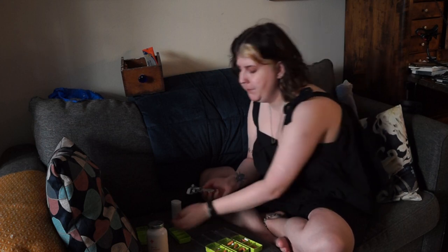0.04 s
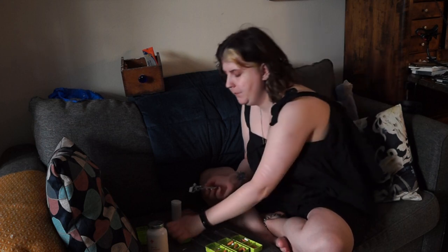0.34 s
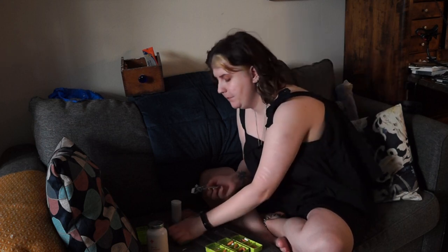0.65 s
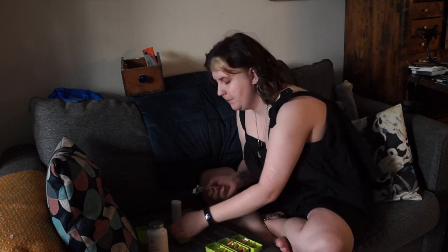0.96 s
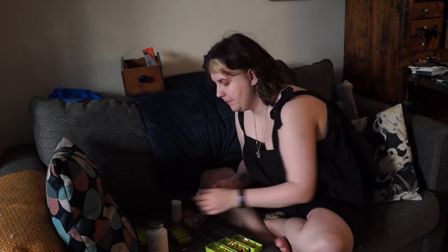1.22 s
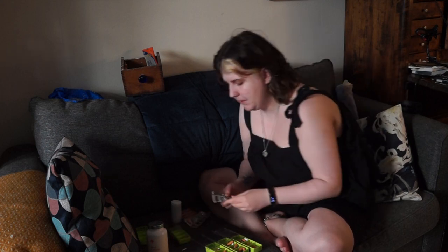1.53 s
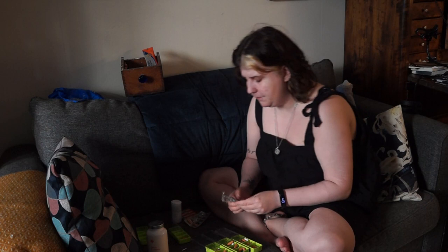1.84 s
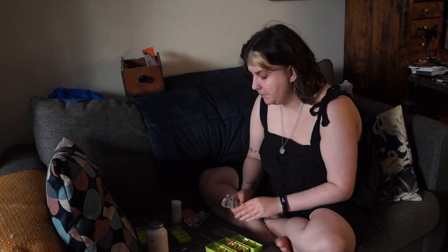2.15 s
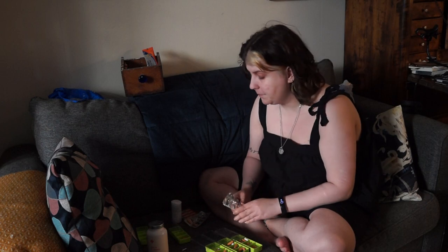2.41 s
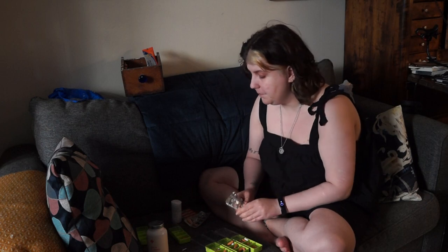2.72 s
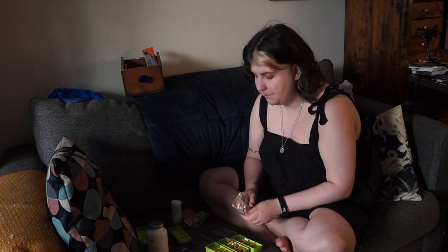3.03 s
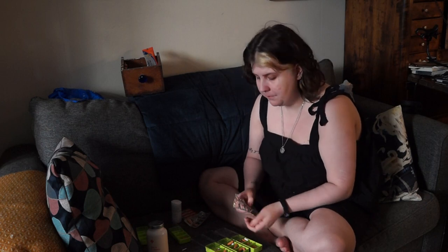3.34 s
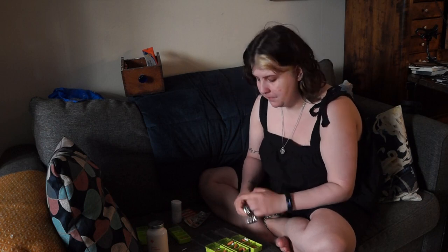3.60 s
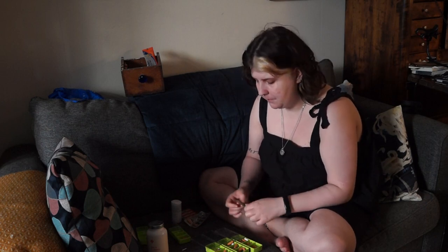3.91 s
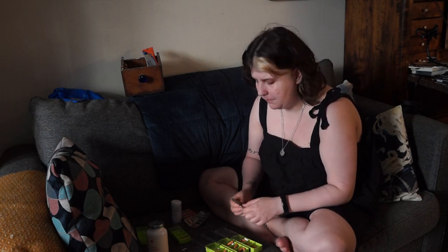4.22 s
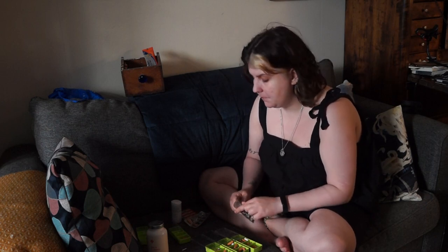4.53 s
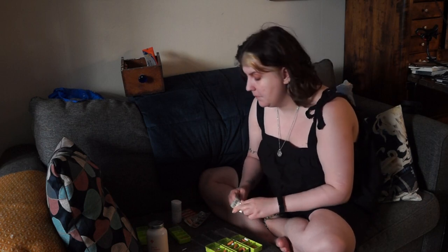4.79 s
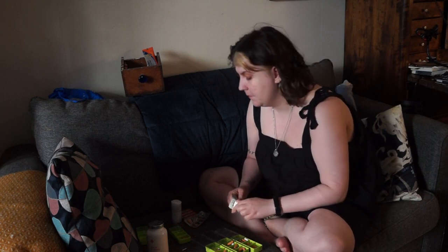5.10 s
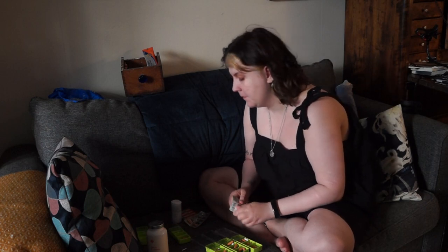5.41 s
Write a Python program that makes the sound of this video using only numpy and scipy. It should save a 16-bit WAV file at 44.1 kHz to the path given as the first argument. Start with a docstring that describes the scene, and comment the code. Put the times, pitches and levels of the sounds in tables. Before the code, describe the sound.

Faint room noise and a thin, high electronic whine run throughout in a small living room. After a light touch at about 0.4 seconds, two tablets land in a plastic organizer with bright, hard clicks at 0.6 and 0.8 seconds. From about 1.3 seconds, fingers handle a blister pack with soft rustles and small ticks. Its stiff pockets begin snapping sharply around 2.1 seconds, and the foil tears with a loud, short crackle at 2.3 seconds. Strong single snaps follow at 2.8 and 3.4 seconds, with lighter clicks and crinkling between and after them. From 4.4 seconds to about 5.5 comes the busiest stretch, a run of sharp snaps and foil crackles, strongest near 4.7 and 5.2 seconds. Everything sounds fairly near, with strong, quick echoes from the close walls that die away almost at once.

```python
"""A small living room: someone on a sofa drops two tablets into a plastic organizer, then presses more
out of a blister pack. The tablets ring the organizer's modes and a fingertip squeaks on it. The pack
rustles as skin sticks and slips, its stiff pockets buckle with sharp snaps, and the foil tears in short
crackles. Close walls answer with strong early echoes; underneath lie room noise and a thin electronic
whine."""
import sys
import numpy as np
from scipy import signal
from scipy.fft import rfft, irfft
from scipy.io import wavfile
from scipy.ndimage import uniform_filter1d

SR = 44100
rng = np.random.default_rng(int(sys.argv[2]) if len(sys.argv) > 2 else 0)


def file_out(sig):
    """Save sig as 16-bit WAV at sys.argv[1]."""
    # one column per channel
    cols = np.atleast_2d(sig).T
    # limit, then scale
    lim = np.clip(cols, -1, 1)
    pcm = np.round(lim * 32767).astype(np.int16)
    wavfile.write(sys.argv[1], SR, pcm)


N = 244842


def from_db(db):
    """Decibels to gain."""
    return 10 ** (np.asarray(db) / 20)


def unit_energy(x):
    """Scale so that the squares sum to one."""
    return x / np.sqrt(np.sum(x ** 2) + 1e-20)


def unit_rms(x):
    """Scale to an rms of one."""
    return x / np.sqrt(np.mean(x ** 2) + 1e-20)


def at_hz(curve, hz):
    """Read a curve of (freq_hz, value) points on a log-frequency axis."""
    freqs_hz, values = np.transpose(curve)
    return np.interp(np.log(np.maximum(hz, 1)), np.log(freqs_hz), values)


def eq(x, curve):
    """Colour a sound with a curve of (freq_hz, gain_db) points."""
    gain = from_db(at_hz(curve, np.fft.rfftfreq(len(x), 1 / SR)))
    return irfft(rfft(x) * gain, len(x))


def band(x, low_hz, high_hz):
    """Causal band-pass."""
    edges = np.clip([low_hz, high_hz], 10, .47 * SR)
    return signal.sosfilt(signal.butter(2, edges, "band", fs=SR, output="sos"), x)


def add(track, start_s, sound):
    """Mix a sound into a track at a given time."""
    start = int(start_s * SR)
    track[..., start:start + sound.shape[-1]] += sound[..., :N - start]


# Colour of the room tone: freq_hz, gain_db
ROOM_TONE_EQ = [(15, -40), (28, -8.5), (55, -7), (85, -4.5), (170, -2.5), (300, -5), (480, -9),
                (1190, -17.5), (2400, -17), (3700, -17), (5200, -19), (8100, -17), (11900, -29.5),
                (15000, -29), (16000, -46)]
# Its stereo width, side against mid: freq_hz, side_db
ROOM_TONE_WIDTH = [(60, -15), (110, -9), (200, -5.5), (380, -1.5), (700, 2), (1290, 3), (2380, -1),
                   (4400, -6), (8120, -9.5), (15000, -33)]

def background(mid_db, whine_db, whine_hz, waver_hz):
    """Steady room tone under a thin, slightly unsteady electronic whine."""
    mid, side = (unit_rms(eq(rng.standard_normal(N), ROOM_TONE_EQ)) for _ in range(2))
    room_tone = from_db(mid_db) * (mid + eq(side, ROOM_TONE_WIDTH) * [[1], [-1]])
    waver = unit_rms(uniform_filter1d(rng.standard_normal(N), size=300))
    pitch_hz = whine_hz + waver_hz * waver
    return room_tone + from_db(whine_db) * np.sin(2 * np.pi * np.cumsum(pitch_hz) / SR)


def grains(size, per_s, spread_db):
    """Tiny clicks at random moments, mostly weak and a few strong."""
    strength = from_db(spread_db * np.minimum(rng.exponential(1, size), 4))
    return (rng.random(size) < per_s / SR) * strength * rng.choice([-1, 1], size)


# Finger strokes over the pack: peak_s, length_s, gain_db
STROKES = [(0.022, 0.28, -56.5), (1.385, 0.21, -45), (1.559, 0.13, -45), (1.795, 0.06, -45),
           (1.99, 0.15, -48.5), (2.547, 0.15, -43.5), (2.702, 0.12, -45.5), (3.079, 0.19, -44.5),
           (3.39, 0.12, -40.5), (3.826, 0.44, -43.5), (4.157, 0.4, -48), (4.416, 0.13, -48),
           (4.754, 0.17, -32), (5.41, 0.29, -38)]
# Colour of skin rubbing on the pack: freq_hz, gain_db
RUSTLE_EQ = [(1180, -19), (2000, -5.5), (2390, -11), (2680, -5), (3990, -3.5), (4470, -1), (7830, 3),
             (12500, -12), (16200, -20), (22000, -120)]

def rustle(per_s, spread_db, gain_db, holding_db=-61.5, rise_share=0.48):
    """Skin sticks and slips in grains that swell with each stroke: dense ones hiss, sparse ones crinkle."""
    t = np.arange(N) / SR
    friction = np.full(N, from_db(holding_db))   # the faint stir of just holding the pack
    for peak_s, length_s, stroke_db in STROKES:
        corners_s = [peak_s - rise_share * length_s, peak_s, peak_s + (1 - rise_share) * length_s]
        friction += from_db(stroke_db) * np.interp(t, corners_s, [0, 1, 0])
    texture = unit_rms(eq(grains(N, per_s, spread_db), RUSTLE_EQ))
    return from_db(gain_db) * friction * texture


def jolt(chatter_db, decay_s):
    """A sudden kick and its dying chatter, flattened to hold all frequencies evenly."""
    t = np.arange(2048) / SR
    chatter = unit_energy(rng.standard_normal(len(t)) * np.exp(-t / decay_s))
    kick = (t == 0) + from_db(chatter_db) * chatter
    flat_spectrum = np.exp(1j * np.angle(rfft(kick)))
    return irfft(flat_spectrum)[:len(t) // 2]


def crack(low_hz, high_hz, chatter_db, decay_s):
    """The brief noise of a contact: one band of a jolt, at unit energy."""
    return unit_energy(band(jolt(chatter_db, decay_s), low_hz, high_hz))


def mode(hz, width, chatter_db, decay_s):
    """One damped mode of the plastic, rung by a jolt; width is roughly bandwidth over pitch."""
    edge_ratio = np.exp(np.clip(width, .05, 1) / 2)
    return crack(hz / edge_ratio, hz * edge_ratio, chatter_db, decay_s)


# Tablets touching and landing in the organizer: start_s, level_db, pitch_ratio, width_ratio
TABLET_HITS = [(.449, -33.5, 1.02, 0.098), (.640, -3.5, 1.005, 0.15), (0.674, -10.5, 1.14, 0.6),
               (.839, -2, 1.066, 0.19)]
# The organizer's ring, and how each mode tracks a hit's pitch: pitch_hz, level_db, tracking_exponent
ORGANIZER_MODES = [(2600, -16, 0.3), (4050, -0.5, 0.86), (5280, -8.5, 0.5), (7620, -7, -.5)]

def tablets(chatter_db, decay_s, crack_db):
    """Each tablet hit gives a contact crack and rings the modes of the organizer."""
    out = np.zeros(N)
    for start_s, level_db, pitch_ratio, width in TABLET_HITS:
        hit = from_db(crack_db) * crack(low_hz=1760, high_hz=9900, chatter_db=chatter_db, decay_s=0.0027)
        for hz, mode_db, tracking in ORGANIZER_MODES:
            hit += from_db(mode_db) * mode(hz * pitch_ratio ** tracking, width, chatter_db, decay_s)
        add(out, start_s, from_db(level_db) * hit)
    return out


def squeak(start_s, length_s, pitch_hz, width_hz, energy_db):
    """A rubbing fingertip keeps one narrow mode of the organizer ringing."""
    out = np.zeros(N)
    slips = rng.standard_normal(int(length_s * SR))
    ring = band(slips, pitch_hz - width_hz / 2, pitch_hz + width_hz / 2)
    add(out, start_s, from_db(energy_db) * unit_energy(ring * np.hanning(len(ring))))
    return out


# Short crackles: foil tearing, scrapes, and bright sizzle on top of some snaps.
# start_s, length_s, energy_db, low_cut_hz
CRACKLES = [(1.342, 0.011, -14.5, 3550), (2.3214, 0.023, 10, 2400), (2.352, 0.06, 0, 3120),
            (2.692, 0.024, -20.5, 2000), (3.43, 0.045, -4, 9000), (4.169, 0.0091, -16.5, 3500),
            (4.669, 0.072, 1, 1300), (5.024, 0.013, -10, 2000), (5.139, 0.014, -7, 6500),
            (5.247, 0.039, -7, 3500), (5.417, 0.022, -10, 5040)]
# Colour of the foil: freq_hz, gain_db
FOIL_EQ = [(590, -67), (1000, -14), (1320, -15.5), (1750, -20.5), (2200, -6), (2390, -10.5), (3190, -4.5),
           (5440, -5), (6330, -3), (8160, 0.5), (11000, -11), (13900, -14.5), (16000, -27)]

def foil(per_s, spread_db, top_hz):
    """Each crackle is a swelling and fading burst of tiny clicks, like the fractures in tearing foil."""
    out = np.zeros(N)
    for start_s, length_s, energy_db, low_cut_hz in CRACKLES:
        clicks = grains(4096, per_s, spread_db)
        progress = np.minimum(np.arange(len(clicks)) / SR / length_s, 1)
        swell = np.sqrt(np.abs(np.sin(np.pi * progress)))
        crackle = band(eq(clicks * swell, FOIL_EQ), low_cut_hz, top_hz)
        add(out, start_s, from_db(energy_db) * unit_energy(crackle))
    return out


# The pack buckling: the flat sheet flexes low, the pocket rings above it, the grip damps both.
# start_s, gain_db, sheet_hz, pocket_hz, sharpness_db, width_ratio
SNAPS = [(1.4655, -19.5, 2400, 4300, -10, 0.26), (1.679, -14, 2800, 4200, 6.5, 0.38),
         (2.0887, -6, 3150, 4030, 8, 0.4), (2.1567, -2.5, 3260, 5000, -3, .27),
         (2.219, -11.5, 3550, 6040, -5, 0.22), (2.4162, -0.5, 3750, 4600, 2, 0.45),
         (2.567, -17, 2600, 3800, 5.5, 0.74), (2.833, -18, 3000, 5200, 8, 0.27),
         (2.8394, 5.5, 3240, 4880, -2, 0.31), (3.2339, -16, 3020, 6300, -1.5, .34),
         (3.307, -20, 2740, 4050, 0, .47), (3.383, -19, 2400, 3330, 0, 0.26),
         (3.4278, 3.5, 3030, 5300, 3.5, 0.37), (3.7273, -9, 2900, 4800, -4, 0.42),
         (3.802, -14.5, 4030, 5200, 3.5, 0.25), (3.8686, -10, 3300, 4800, -1, 0.2),
         (4.172, -15.5, 2290, 4630, 3, 0.24), (4.4603, -0.5, 3200, 6450, -0.5, 0.21),
         (4.5599, 0.5, 3480, 5130, -5, 0.3), (4.6597, 4.5, 2400, 3960, 5, 0.55),
         (4.7233, -1.5, 2660, 4400, -15, 0.67), (4.8632, -4, 3590, 6170, 4, 0.25),
         (4.997, -20.5, 2420, 3640, 2, 0.38), (5.023, -7, 2680, 3800, -4.5, 0.4),
         (5.132, -15, 2600, 3620, 7, 0.46), (5.1367, -6.5, 2600, 3930, 3, 0.31),
         (5.18, 2.5, 3760, 6000, -3, 0.44), (5.24, 2, 2070, 5800, 4, 0.33),
         (5.33, -12.5, 2450, 4600, -3, .11), (5.4069, -2, 6100, 6430, -7, 0.25),
         (5.4695, -8, 1650, 4540, 7, 0.36)]

def snaps(chatter_db, decay_s, crack_db):
    """Sheet, pocket and crease ring together; a sharper snap has more crease and more crack."""
    out = np.zeros(N)
    for start_s, gain_db, sheet_hz, pocket_hz, sharpness_db, width in SNAPS:
        sheet_db = -9.5 + 6 * np.log2(sheet_hz / 3000)   # slower flexing radiates less
        sheet_width = 0.71 * width   # narrower, so the sheet rings longer
        crease_hz = 7080 * (pocket_hz / 4570) ** 0.26   # rings highest, rising a little with the pocket
        attack = crack(low_hz=2400, high_hz=12600, chatter_db=chatter_db, decay_s=0.0022)
        snap = from_db(crack_db + 0.21 * sharpness_db) * attack
        snap += from_db(sheet_db) * mode(sheet_hz, sheet_width, chatter_db, decay_s)
        snap += mode(pocket_hz, width, chatter_db, decay_s)
        snap += from_db(sharpness_db) * mode(crease_hz, width, chatter_db, decay_s)
        add(out, start_s, from_db(gain_db) * snap)
    return out


# Level ride on the pack's direct sound: time_s, gain_db
FACING = [(1.6, 0.5), (2.1, -3), (2.4, 2), (3.7, 1), (4.661, 0.5), (4.86, 3.5), (5.03, 0), (5.2, 0.5)]

def turning(pack):
    """The pack turns in the hands, beaming its sound at the listener or past them."""
    return pack * from_db(np.interp(np.arange(N) / SR, *np.transpose(FACING)))


# Reverb time of the living room: freq_hz, t60_s
ROOM_DECAY = [(1000, 0.22), (3000, 0.31), (6000, 0.29), (9000, 0.31), (14000, 0.11)]

def room(x, echoes, tail_db, predelay_s, build_s, side_db):
    """Distinct early echoes in the centre, over a diffuse stereo tail that swells and dies away."""
    t = np.arange(SR // 2) / SR
    early = np.zeros(len(t))
    for delay_s, echo_db in echoes:
        shift_s = rng.uniform(-.00022, .00022)   # each path varies by a few centimetres
        early[int((delay_s + shift_s) * SR)] += from_db(echo_db)
    edges_hz = np.geomspace(500, 18000, 8)
    tail = np.zeros((2, len(t)))
    for low_hz, high_hz in zip(edges_hz, edges_hz[1:]):
        t60_s = at_hz(ROOM_DECAY, np.sqrt(low_hz * high_hz))
        tail += band(rng.standard_normal(tail.shape), low_hz, high_hz) * 1000 ** (-t / t60_s)
    fade_in = np.clip((t - predelay_s) / build_s, 0, 1)
    mid, side = (from_db(tail_db) * unit_energy(part) for part in tail * fade_in)
    response = early + mid + from_db(side_db) * side * [[1], [-1]]
    return signal.fftconvolve(x[None], response, axes=1)[:, :N]


# Early reflections off walls and ceiling, from the hands: delay_s, level_db
HAND_ECHOES = [(.0085, 0), (0.0097, -1.5), (0.01, -9.5), (.0146, -7), (.0165, -35), (.0235, -17),
               (.027, -6.5)]

def pack_reverb(pack):
    """The hands keep shifting, so every half second the pack meets a new pattern of reflections."""
    out, step = np.zeros((2, N)), SR // 2
    for start in range(0, N, step):
        piece = pack[start:start + step]
        wet = room(piece, HAND_ECHOES, tail_db=0.9, predelay_s=0.0024, build_s=0.016, side_db=-13.5)
        add(out, start / SR, wet)
    return out


# Early reflections from the organizer, lower down: delay_s, level_db
ORGANIZER_ECHOES = [(.0092, -3), (0.0097, 3.5), (0.0144, -23), (0.0178, -18), (.027, -10)]

def organizer_reverb(organizer):
    """The organizer stays put, so one pattern of reflections answers all its sounds."""
    return room(organizer, ORGANIZER_ECHOES, tail_db=2.0, predelay_s=0.0043, build_s=0.0038, side_db=-14.5)


def scene():
    """Organizer and blister pack, direct and through the room, over the background bed."""
    organizer = tablets(chatter_db=5.0, decay_s=0.005, crack_db=-10.5)
    organizer += squeak(start_s=0.525, length_s=0.095, pitch_hz=3650, width_hz=260, energy_db=-32)
    buckling = from_db(-1.6) * snaps(chatter_db=1, decay_s=0.0021, crack_db=-14.5)
    crackling = foil(per_s=6000, spread_db=3.2, top_hz=20000)
    crinkle = rustle(per_s=150, spread_db=4, gain_db=-10)
    hiss = rustle(per_s=3500, spread_db=2.0, gain_db=-9)
    pack = buckling + crackling + crinkle + hiss
    reverb = organizer_reverb(organizer) + pack_reverb(pack)
    bed = background(mid_db=-50, whine_db=-55, whine_hz=13184, waver_hz=6.8)
    return organizer + turning(pack) + reverb + bed


def record(dry):
    """Hard-clip the highest peaks, then cut the top with a steep low-pass."""
    ceiling, cutoff_hz = 0.92, 16000
    low_pass = signal.ellip(10, .1, 80, cutoff_hz, fs=SR, output="sos")
    return signal.sosfilt(low_pass, np.clip(dry, -ceiling, ceiling))


dry = scene()
out = record(dry)
file_out(out)
```